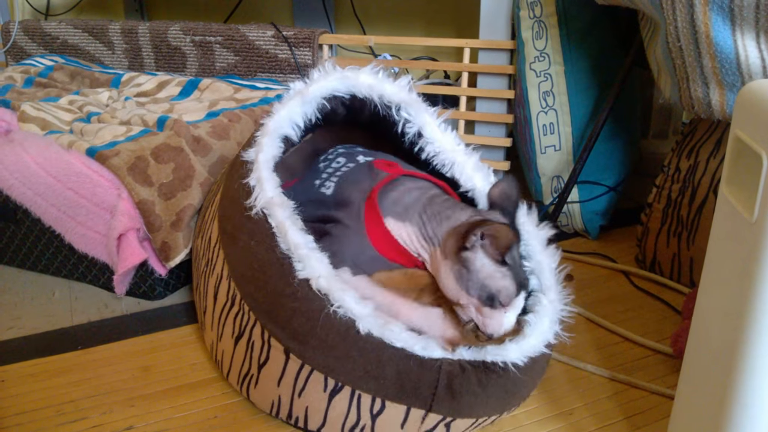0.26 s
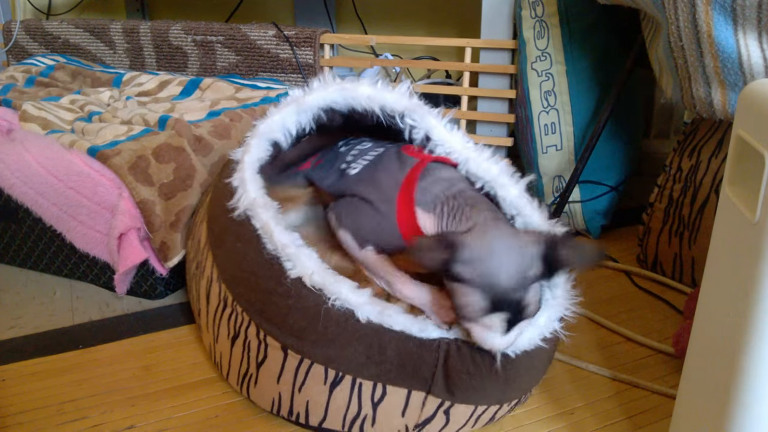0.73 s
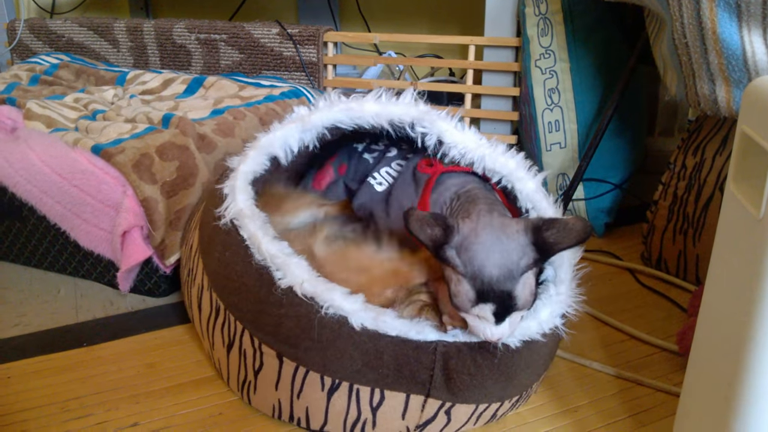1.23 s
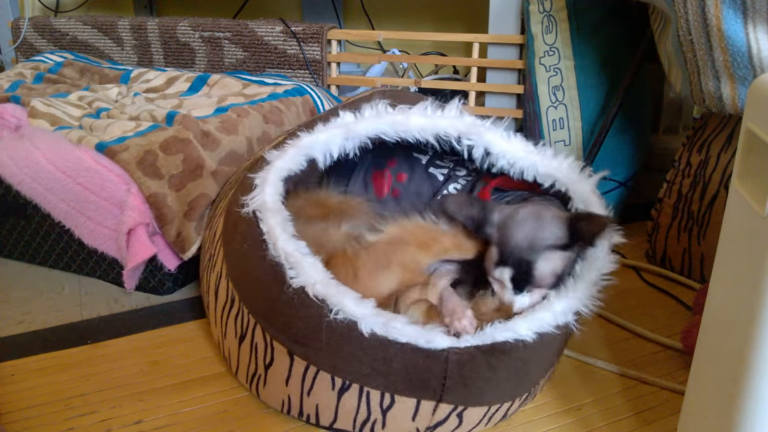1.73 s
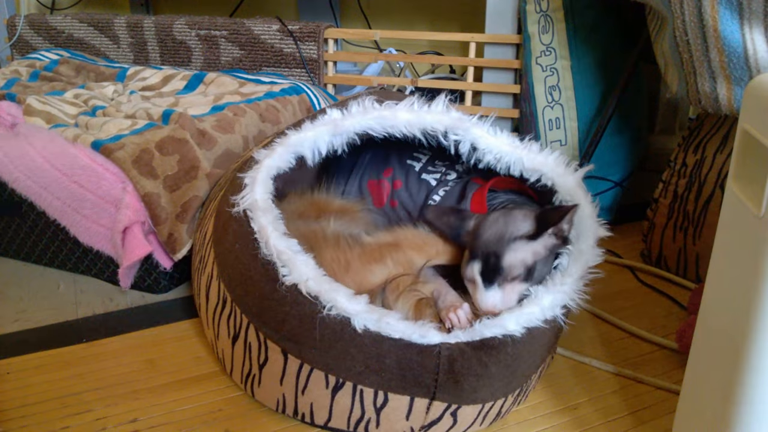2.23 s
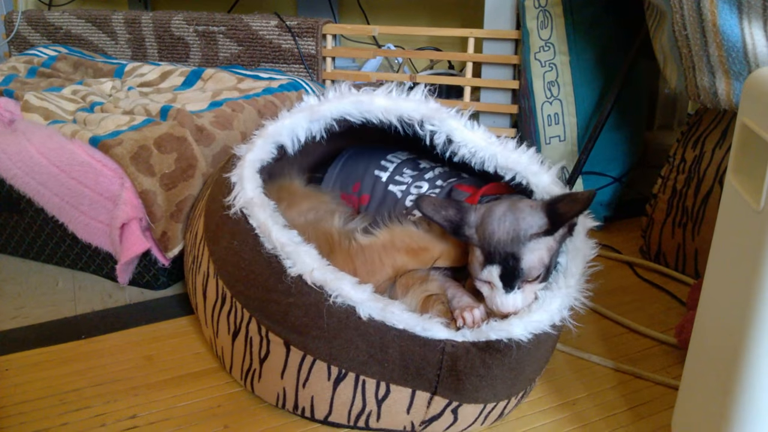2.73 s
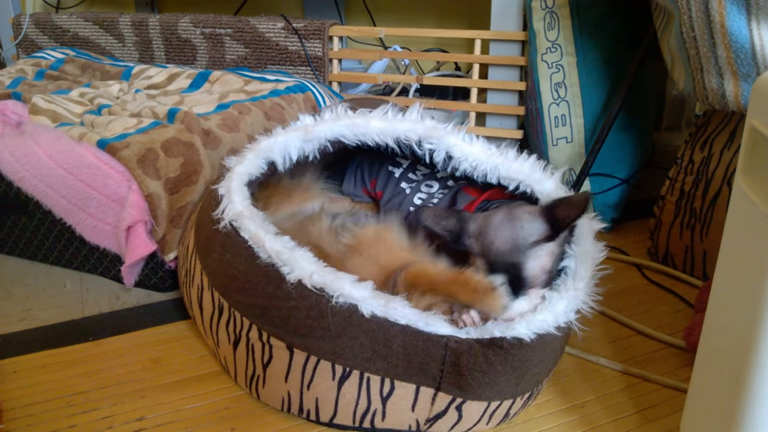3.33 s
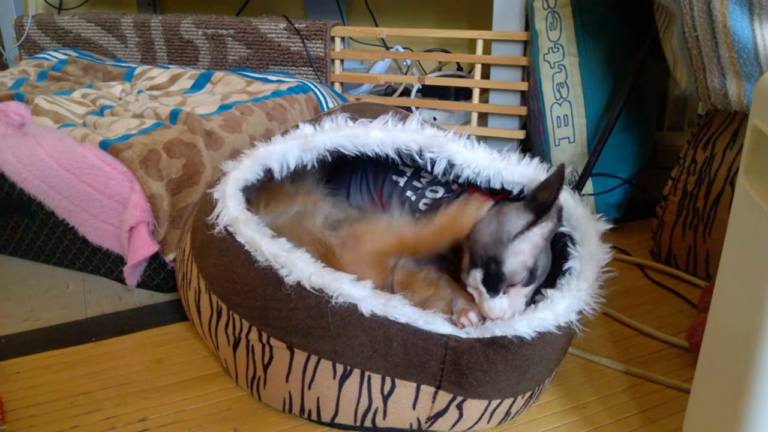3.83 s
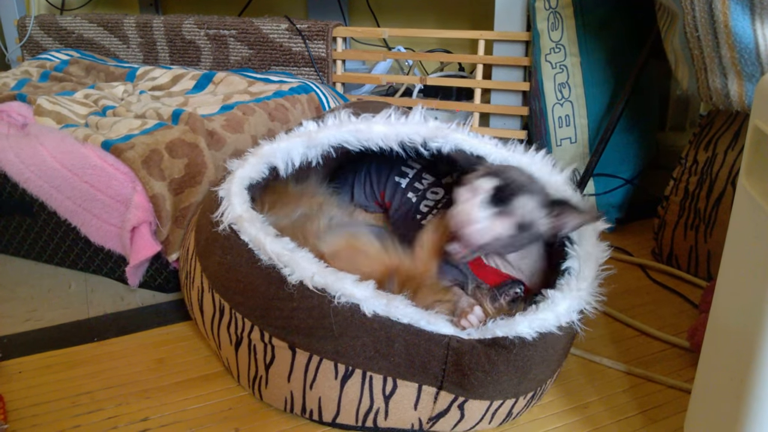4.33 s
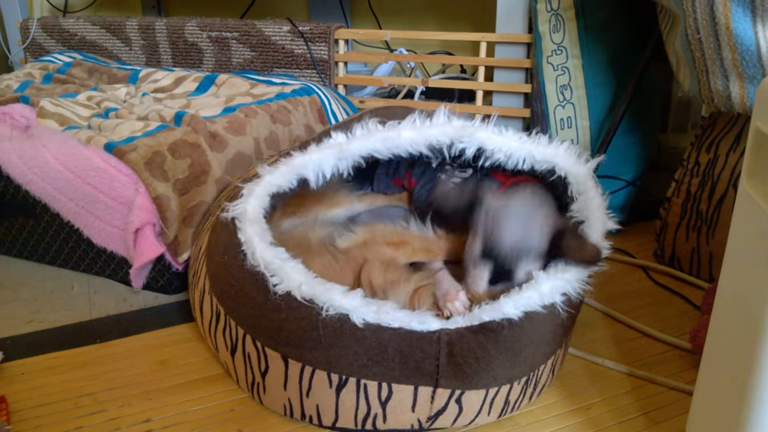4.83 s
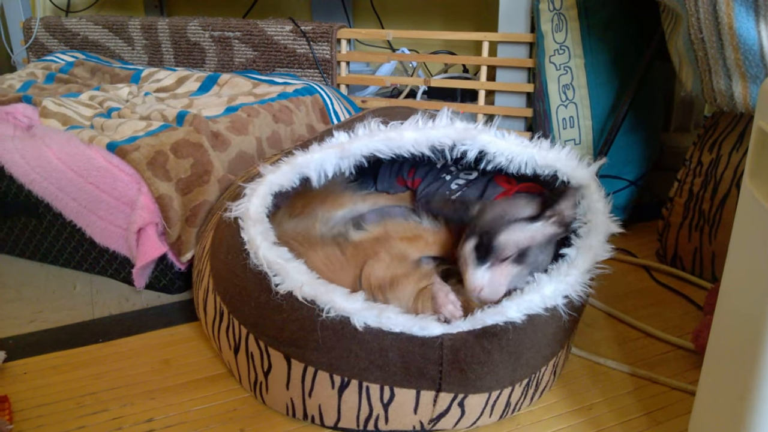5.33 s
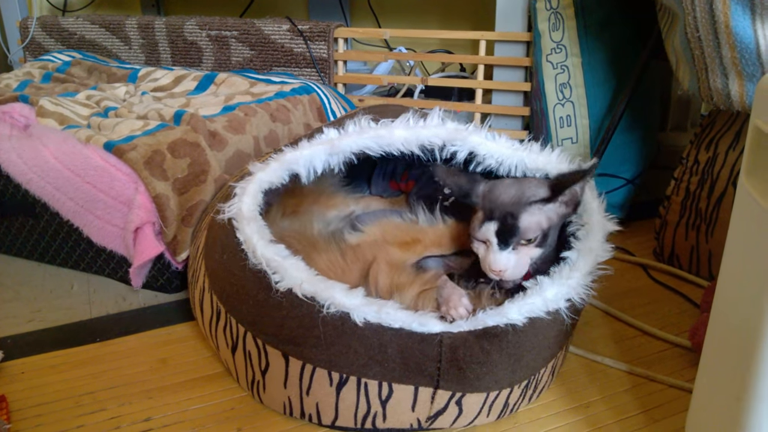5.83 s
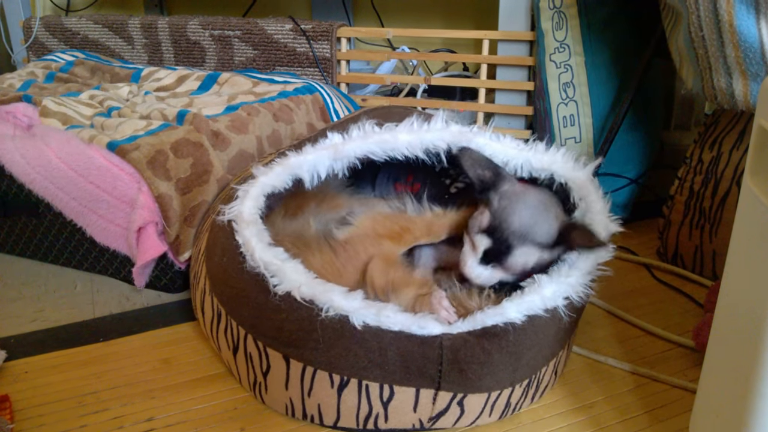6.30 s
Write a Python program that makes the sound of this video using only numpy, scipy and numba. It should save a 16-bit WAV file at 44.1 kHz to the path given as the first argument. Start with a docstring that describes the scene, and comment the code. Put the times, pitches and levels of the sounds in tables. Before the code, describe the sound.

A cat is heard close up, wrestling in a padded bed in a small, softly furnished room. It opens with a cry that falls in pitch over the first 0.4 seconds. From about 0.6 to 2.4 seconds come short, hoarse yelps and grunts, a few catching with small clicks. At 2.5 seconds the cat begins a long, low, wavering moan, held until 4.7 seconds with occasional pops and clicks in the voice. A brief, higher rasping cry follows around 5 seconds. Two grunts near 5.6 seconds lead into a rough, low growl, which breaks upward at 6.2 seconds into a yowl lasting until about 6.6 seconds. Bedding scuffs very faintly around 0.6, 2.1 and 5.4 seconds, and the bed rumbles softly on the floor near 5.8 seconds. Quiet room tone with a low hum runs underneath throughout.

```python
"""A small, softly furnished room, one microphone close to a padded bed where two cats wrestle.
One cat gives a falling cry, short yelps, a long wavering moan, a rasping cry, and a low growl that
breaks upward into a yowl. Its vocal folds pulse through six resonances, from chest to teeth, and
the voice catches with pops and clicks. Bedding rustles and the bed rumbles on the floor, over
quiet room tone with a low hum."""
import sys
import numpy as np
from scipy import signal
from scipy.fft import rfft, irfft, next_fast_len
from scipy.io import wavfile
from scipy.ndimage import map_coordinates
from numba import njit

SR = 44100
rng = np.random.default_rng(int(sys.argv[2]) if len(sys.argv) > 2 else 0)


def master_out(mix):
    """Clip the mix to full scale and print it as 16-bit PCM to the path in sys.argv[1]."""
    frames = np.transpose(np.atleast_2d(mix))
    ceiling = np.clip(frames, -1, 1)
    pcm = np.round(ceiling * 32767).astype(np.int16)
    wavfile.write(sys.argv[1], SR, pcm)


N = 289296
TIME = np.arange(N) / SR

# moments when the voice catches: time_s, level_db, brightness_db (0 and above is all click, no pop)
CATCHES = [(2.434, -41, -29), (3.057, -38, 1), (1.594, -27, -2), (1.737, -33, -7), (3.363, -25, -2),
           (4.041, -37.5, -23), (4.133, -33.5, 0.5), (4.693, -36, -10), (4.958, -28, 1.5), (5.006, -29, 0),
           (5.058, -42, -3.5), (6.328, -29, 0)]


def amp(db):
    """Decibels to gain."""
    return 10 ** (np.asarray(db) / 20)


def unit(x):
    """x at rms 1."""
    return x / np.sqrt(np.mean(x ** 2) + 1e-20)


def along(points, hz):
    """Read (frequency_hz, value) points at hz, on a log frequency axis."""
    knots_hz, values = np.transpose(points)
    return np.interp(np.log(hz + 1), np.log(knots_hz + 1), values)


def curves(rows, t):
    """Each column after the time, at times t."""
    times, *columns = np.transpose(rows)
    return [np.interp(t, times, column) for column in columns]


def gate(start, end, fade_s):
    """1 from start to end, fading to 0 outside."""
    return np.clip(1 + np.minimum(TIME - start, end - TIME) / fade_s, 0, 1)


def around(start, end, margin_s=0.04):
    """Sample times of a call, with a margin."""
    return TIME[(TIME > start - margin_s) & (TIME < end + margin_s)]


def wobble(rate, size):
    """A smooth random curve, rate knots a second."""
    knots = rng.standard_normal(int(size * rate / SR) + 4)
    return map_coordinates(knots, [np.arange(size) * rate / SR])


def filtered(x, response):
    """Filter x by a gain given as a function of frequency."""
    size = next_fast_len(N + SR // 4)
    return irfft(rfft(x, size) * response(np.fft.rfftfreq(size, 1 / SR)), size)[:N]


def coloured(x, spectrum):
    """Filter x by (frequency_hz, gain_db) points."""
    return filtered(x, lambda hz: amp(along(spectrum, hz)))


def noise(spectrum):
    """Coloured noise of rms 1."""
    return unit(coloured(rng.standard_normal(N), spectrum))


def room_tone(air_db=-65, hum_hz=58.97, hum_db=-72):
    """Room air, steady hiss and a low wavering hum."""
    # air and hiss: frequency_hz, density_db
    air_spectrum = [(15, -56.5), (25, -23), (50, -28.5), (85, -11.5), (140, -15), (200, -19), (430, -19),
                    (700, -28.5), (1300, -28), (2000, -31.5), (3500, -32), (5500, -34), (7800, -42.5),
                    (16000, -40.5)]
    hum = np.sqrt(2) * np.sin(2 * np.pi * hum_hz * TIME + 2.0 * wobble(11, N))
    return amp(air_db) * noise(air_spectrum) + amp(hum_db + 2.6 * wobble(1.46, N)) * hum


def vocal_folds(pitch_hz, rough, jitter=0.1262, waver=0.00852, shimmer_db=8, doubling=0.21):
    """Glottal pulses and the air that escapes with each; roughness unsettles period and size."""
    size = len(pitch_hz)
    hz = pitch_hz * np.exp(jitter * rough * wobble(160, size) + waver * wobble(45, size))
    phase = 2 * np.pi * np.cumsum(hz) / SR
    offset = (phase / (2 * np.pi) % 1 - .5) * SR / hz  # samples from the nearest closure
    pulses = unit(np.sinc(offset / 2) * np.exp(-(offset / 10) ** 2))
    pulses *= amp(shimmer_db * rough * wobble(200, size))
    pulses *= 1 + doubling * rough * np.sin(phase / 2)  # hoarse: strong and weak pulses alternate
    air = unit(rng.standard_normal(size) * np.exp(-1.5 * np.cos(phase)))
    return pulses, air * rough


@njit
def resonate(x, step, damping):
    """A damped oscillator whose tuning may move; returns its velocity."""
    out, position, velocity = np.zeros(len(x)), 0., 0.
    for i in range(len(x)):
        position += step[i] * velocity
        velocity += damping[i] * (x[i] - velocity) - step[i] * position
        out[i] = velocity
    return out


def formant(x, hz, width_hz):
    """A steep resonance, held at rms 1 as harmonics slide through it."""
    step = 2 * np.sin(np.pi * hz / SR) * np.ones(len(x))
    damping = 2 * np.pi * width_hz / SR * np.ones(len(x))
    ringing = resonate(resonate(x, step, damping), step, damping)
    window = np.hanning(SR // 40)
    power = np.abs(signal.fftconvolve(ringing ** 2, window / window.sum(), 'same'))
    return ringing / np.sqrt(power + 1e-12)


def voice(t, pitch_hz, level_db, bright_db, mouth_hz, treble_db, rough, palate_db, teeth_db, teeth_hz):
    """One call: pitch shares it between chest and throat, an open mouth adds the upper resonances."""
    # low notes sound in the chest, higher ones mostly in the throat: pitch_hz, chest_over_throat_db
    register = [(120, 10), (190, 9), (218, 7.5), (232, 3), (245, -2), (270, -8), (310, 2), (350, 0),
                (410, -5.5), (480, -6), (600, 9.5)]
    pulses, air = vocal_folds(pitch_hz, rough)
    chest_ratio = amp(along(register, pitch_hz) - 0.36 * (bright_db + 1))  # a bright voice loses chest
    throat_share = 1 / np.sqrt(1 + chest_ratio ** 2)
    throat_hz = 765 * (pitch_hz / 261.7) ** 0.093  # the throat tunes up a little with the note
    lip_db = treble_db + 3.4
    # mouth and lips carry the most air, chest and throat the most tone
    chest = amp(-5) * chest_ratio * throat_share * formant(pulses + 0.88 * air, hz=155, width_hz=230)
    throat = amp(-2.13) * throat_share * formant(pulses + 0.81 * air, throat_hz, width_hz=158)
    mouth = amp(bright_db + 1) * formant(pulses + 2.7 * air, mouth_hz, width_hz=mouth_hz / 4.3)
    lips = amp(lip_db) * formant(pulses + 5.7 * air, hz=2620, width_hz=580)
    palate = amp(palate_db + lip_db) * formant(pulses + 1.5 * air, hz=3750, width_hz=900)
    teeth = amp(teeth_db + 0.74 * lip_db) * formant(pulses + 1.5 * air, teeth_hz, width_hz=1220)
    gurgle_db = 3.5 * rough * wobble(59.907, len(t))  # hoarse stretches gurgle
    call = (chest + throat + mouth + lips + palate + teeth) * amp(level_db + gurgle_db)
    return np.interp(TIME, t, call, left=0, right=0)


def long_call(effort, pitch, rough, palate_db, teeth_db, teeth_hz):
    """A held call follows effort and pitch; rough and teeth_db drift between (start, end) values."""
    start, end = effort[0][0], effort[-1][0]
    t = around(start, end)
    hoarse = np.interp(t, [start, end], rough)
    # the voice turns hoarser around each catch
    hoarse += sum(0.106 * np.exp(-((t - time_s) / 0.01376) ** 2) for time_s, _, _ in CATCHES)
    hiss_db = np.interp(t, [start, end], teeth_db)
    call = voice(t, *curves(pitch, t), *curves(effort, t), hoarse, palate_db, hiss_db, teeth_hz)
    return call * gate(start, end, fade_s=0.003)


def long_calls():
    """The folds keep pulsing while the mouth moves: cry, moan, rasp, growl and yowl."""
    # effort and mouth shape: time_s, level_db, brightness_db, mouth_hz, treble_db
    # (brightness lifts the mouth over chest and throat, treble the lips)
    cry = [(0.0, -57.5, 5.5, 1500, -15), (0.054, -46.5, 16.5, 1730, 5.5), (0.122, -48, 1.5, 1830, -10),
           (0.16, -51.5, 2, 1560, -18), (0.188, -43, -3, 1463, -15), (0.22, -45, -4, 1300, -18),
           (0.25, -47, -20, 1265, -26), (0.276, -48.5, -1, 1295, -39), (0.29, -46.5, -6.5, 1230, -26),
           (0.33, -54, 0, 1280, -31), (0.35, -49.5, -9, 1191, -41), (0.376, -59, 5, 1220, -35),
           (0.4, -60, -5, 1240, -32)]
    moan = [(2.46, -50.5, -26.5, 1290, -42), (2.48, -41.5, -27, 1270, -36), (2.54, -45, -14.5, 1170, -33),
            (2.73, -45, -13, 1170, -25), (2.77, -44.5, -16, 1460, -25), (2.87, -48, -7.5, 1803, -10.5),
            (2.99, -44.5, -8, 1972, -15), (3.11, -45.5, -6.5, 1720, -11), (3.16, -42.5, -11, 1754, -37),
            (3.23, -43.5, -8.5, 1865, -16), (3.37, -45.5, -8.5, 1777, -14.5), (3.44, -45, -15.5, 1440, -19),
            (3.52, -45, -13, 1376, -19.5), (3.57, -44, -9.5, 1713, -11.5),
            (3.78, -42.5, -12.5, 1540, -20.5), (3.89, -47.5, -6, 1650, -16), (3.95, -44, -14, 1640, -28),
            (4.05, -39.5, -19, 1387, -26.5), (4.26, -39, -10, 1656, -13.5), (4.39, -45.5, -4, 1532, -18),
            (4.46, -42.5, -13, 1453, -38), (4.54, -40.5, -9, 1510, -24.5), (4.58, -45, -10.5, 1429, -31),
            (4.66, -42, -5, 1822, -21), (4.7, -54.5, -23, 1710, -20.5), (4.71, -66, -10, 1645, -13)]
    rasp = [(4.899, -55.5, -8.5, 1380, -1.5), (4.923, -44.5, -7.5, 1400, -0.5), (4.957, -53, 0, 1500, 7),
            (4.983, -46.5, -10, 1260, -3), (5.037, -48, 0.5, 1930, 0), (5.063, -50, -13, 1890, 2.5),
            (5.075, -55, -8, 1920, -13)]
    growl = [(5.745, -48.5, -12.5, 1800, -25), (5.803, -41, -6.5, 1740, -16),
             (5.851, -45, -20.5, 1590, -25), (5.909, -43, -15, 1446, -28), (5.981, -41, -22, 1270, -31),
             (6.047, -42, -7, 1550, -13.5), (6.137, -41, 3.5, 1820, -5), (6.165, -46.5, 1, 1830, 2.5)]
    yowl = [(6.165, -47.5, 1, 2100, -8.5), (6.235, -43.5, 3.5, 1901, -0.5), (6.325, -47.5, 7, 2030, 1),
            (6.361, -56, -10.5, 1950, -2), (6.393, -48, 3, 1760, -14), (6.443, -41, -0.5, 1630, -4),
            (6.459, -49, -0.5, 1580, -7), (6.509, -45, -2, 1225, -13.5), (6.56, -44.5, 5, 1228, -17)]
    # pulse rate of the folds: time_s, pitch_hz
    cry_pitch = [(0, 513), (0.059, 455), (0.079, 484.3), (0.106, 451), (.117, 610), (0.13, 600),
                 (0.186, 425.6), (0.242, 411), (0.271, 429.7), (.33, 316.3), (0.399, 293.6)]
    moan_pitch = [(2.46, 219.8), (2.48, 206), (2.51, 232.2), (2.78, 229.7), (2.82, 250.4), (2.85, 237),
                  (2.92, 249.4), (2.96, 277.7), (3.03, 253.3), (3.06, 283.5), (3.12, 238.1), (3.19, 275),
                  (3.41, 266.5), (3.46, 279), (3.59, 244.9), (3.75, 230.5), (3.9, 244.9), (3.93, 230.9),
                  (4.01, 231.9), (4.04, 220.8), (4.08, 238.3), (4.1, 237.9), (4.13, 218.2), (4.31, 223.3),
                  (4.36, 239.5), (4.47, 229.7), (4.51, 249.9), (4.53, 234.6), (4.65, 281.1), (4.71, 260)]
    rasp_pitch = [(4.895, 384), (4.924, 415.2), (4.958, 398.3), (4.966, 447), (5.0, 347.3), (5.037, 348.7),
                  (5.075, 318)]
    growl_pitch = [(5.746, 107.2), (5.804, 129.2), (5.858, 110.8), (5.95, 117.6), (5.993, 161.2),
                   (6.122, 183.7), (6.166, 233)]
    yowl_pitch = [(6.164, 294.6), (6.212, 417), (6.308, 445), (6.33, 398.6), (6.354, 317.2), (6.4, 428.7),
                  (6.466, 347), (6.523, 386.5), (6.56, 358)]
    return sum([
        long_call(cry, cry_pitch, rough=(0.15, 0.047),
                  palate_db=-7, teeth_db=(-11, -10), teeth_hz=6600),
        long_call(moan, moan_pitch, rough=(0.132, 0.15),
                  palate_db=-13, teeth_db=(-9, -30), teeth_hz=5300),
        long_call(rasp, rasp_pitch, rough=(0.1134, 0.226),
                  palate_db=-11, teeth_db=(-26, -30), teeth_hz=5800),
        long_call(growl, growl_pitch, rough=(0.368, 0.407),
                  palate_db=-5, teeth_db=(-13, -15), teeth_hz=5550),
        long_call(yowl, yowl_pitch, rough=(0.261, 0.054),
                  palate_db=-7, teeth_db=(-31, -25), teeth_hz=4700),
    ])


def bedding(edge_drop_db=38, grain_db=3):
    """Fabric scuffs unevenly as the cats shift."""
    # scuffs: peak_s, half_length_s, peak_db
    scuffs = [(.44, 0.066, -81), (.56, .07, -74), (.65, 0.068, -77), (.78, 0.024, -72.5),
              (2.008, 0.0162, -67), (2.136, 0.04, -68), (5.305, 0.064, -64.5), (5.42, 0.064, -62.5)]
    # rubbed fabric: frequency_hz, density_db
    fabric_spectrum = [(300, -38), (900, -21), (1800, 9), (2600, 16), (3500, -2.5), (5500, 1.5),
                       (8000, -52.5), (14000, -21)]
    rub = sum(amp(peak_db - edge_drop_db * ((TIME - peak_s) / half_length_s) ** 2)
              for peak_s, half_length_s, peak_db in scuffs)
    return rub * unit(noise(fabric_spectrum) * amp(grain_db * wobble(84, N)))


def yelps(bend=1.68, mouth_rise=0.076):
    """The mouth opens and shuts once: each yelp swells, brightens and fades."""
    # yelps and grunts: peak_s, rise_s, fall_s, first_pitch_hz, middle_pitch_hz, last_pitch_hz,
    # level_db, brightness_db, mouth_hz, roughness (0-1)
    calls = [ (0.561, 0.047, 0.065, 206.5, 178.7, 177, -59.5, -13, 1500, 0.32),
             (0.625, 0.032, 0.023, 185.5, 191, 179, -54.5, -14, 1270, 0.29),
             (0.851, .028, 0.03, 289, 224.6, 185, -39.5, 5, 2040, 0.1),
             (1.186, 0.029, 0.035, 182.6, 193.1, 137, -35, -7.5, 1750, 0.31),
             (1.303, 0.037, 0.057, 177, 167.2, 121, -36, -15, 1690, 0.29),
             (1.422, 0.03746, 0.0442, 196.1, 187.8, 133.2, -34, -4.5, 1760, 0.27),
             (1.588, .062, 0.017, 293.3, 337.8, 305, -38.5, 1, 1860, .13),
             (1.733, .066, .025, 320.9, 335.6, 255, -41.5, 0.5, 1970, 0.16),
             (2.233, 0.027, 0.038, 268, 201.4, 195, -38.5, -3.5, 1700, 0.21),
             (2.379, 0.042, 0.02, 272.8, 170.2, 126, -40.5, -12.5, 1620, 0.26),
             (5.49, 0.063, .025, 229, 250, 240, -57, -39.5, 1400, 0.31),
             (5.575, 0.031, 0.036, 159.6, 151.7, 130, -35.5, -17, 1380, 0.37),
             (5.685, 0.055, 0.055, 119.2, 129.4, 98.4, -42.5, -4.5, 1760, 0.54), ]
    # the lips ring more as the mouth opens: mouth_hz, lips_over_mouth_db
    lip_opening = [(1300, -26), (1550, -5.5), (1750, -6.5), (1950, -3)]
    out = np.zeros(N)
    for peak_s, rise_s, fall_s, *pitches_hz, peak_db, peak_bright_db, mouth_hz, rough in calls:
        start, end = peak_s - rise_s, peak_s + fall_s
        t = around(start, end)
        early = np.clip((peak_s - t) / rise_s, 0, 1)
        late = np.clip((t - peak_s) / fall_s, 0, 1)
        pitch_hz = np.interp(t, [start, peak_s, end], pitches_hz)
        level_db = peak_db - 16 * early ** bend - 21 * late ** bend
        bright_db = peak_bright_db - 9.5 * early ** bend - 33 * late ** bend
        treble_db = bright_db + along(lip_opening, mouth_hz)
        opening_hz = mouth_hz * (1 - mouth_rise * early)
        yelp = voice(t, pitch_hz, level_db, bright_db, opening_hz, treble_db, rough,
                     palate_db=-18, teeth_db=-29, teeth_hz=5200)
        out += yelp * gate(start, end, fade_s=0.0014)
    return out


def catches(chest_hz=210, throat_hz=790, pop_life_s=0.0023, click_life_s=0.0045):
    """Single slack flaps of the folds thump in the chest and click in the mouth."""
    pops, clicks = np.zeros(N), np.zeros(N)
    t = np.arange(SR // 10) / SR
    ring = np.sin(2 * np.pi * chest_hz * t) + amp(-9) * np.sin(2 * np.pi * throat_hz * t)
    pop = ring * t / pop_life_s * np.exp(1 - t / pop_life_s)
    for time_s, level_db, bright_db in CATCHES:
        click_share = min(amp(bright_db), 1)  # a bright catch has little thump
        click = np.exp(-t / click_life_s) * rng.standard_normal(len(t))
        onset = round(time_s * SR)
        pops[onset:onset + len(t)] += amp(level_db - 6) * (1 - click_share) * pop
        clicks[onset:onset + len(t)] += amp(level_db - 2) * click_share * click
    mouth_band = signal.butter(4, [600, 3000], 'bandpass', fs=SR, output='sos')
    return pops + signal.sosfilt(mouth_band, clicks)


def cat():
    """All the calls, heard from the opening of the padded bed."""
    # a nasal dip, and dulling by fur and bedding: frequency_hz, gain_db
    muffling = [(100, 6), (165, 5), (240, 4.5), (330, 7.5), (500, -1.5), (700, 4.5), (880, 3.5),
                (1100, -0.5), (1300, 1.5), (1600, -3), (1900, -3.5), (2350, 0.5), (2900, -6.5), (3250, -14),
                (3550, -2.5), (4100, -17), (4900, -7.5), (6000, -5.5), (6900, -17.5), (9000, -21.5),
                (13000, -27)]
    return coloured(yelps() + long_calls() + catches(), muffling)


def bed_rumble():
    """The padded bed rocks on the floor as the cats heave against it."""
    # heaves: start_s, end_s, level_db
    heaves = [(5.642, 5.953, -55), (6.181, 6.38, -84.5)]
    # the bed's low thud: frequency_hz, density_db
    thud_spectrum = [(15, -28), (35, -12.5), (60, -2), (80, 11.5), (160, -35), (400, -91)]
    rocking = sum(amp(level_db) * gate(start, end, fade_s=0.061) for start, end, level_db in heaves)
    return rocking * noise(thud_spectrum)


def room_reverb(x, build_s=0.00133):
    """The small room's answer builds up quickly, is thin in the bass and dies sooner in the treble."""
    # time to die away by 60 dB: frequency_hz, decay_s
    decay_times = [(150, 0.34), (1500, 0.16), (4000, 0.0793), (10000, 0.081)]
    # what the room returns to the microphone: frequency_hz, gain_db
    room_colour = [(200, -18.5), (650, -17), (1100, -5), (1600, -5), (2100, -7), (8000, 2)]
    hz, t, bands = signal.stft(rng.standard_normal(SR // 2), SR, nperseg=256)
    decay = amp(-60 * t / along(decay_times, hz)[:, None])
    build_up = 1 - np.exp(-t / build_s)
    _, tail = signal.istft(bands * decay * build_up, SR, nperseg=256)
    reflections = signal.fftconvolve(x, tail / np.linalg.norm(tail))[:N]
    return coloured(reflections, room_colour)


def scene():
    """The cats close to the microphone, the small room behind them, in mono."""
    near = cat() + bedding()
    return (near + room_reverb(near) + bed_rumble() + room_tone())[None]


def record(dry):
    """The recorder keeps nothing above its band limit."""
    return filtered(dry[0], lambda hz: hz < 17150)[None]


dry = scene()
out = record(dry)
master_out(out)
```